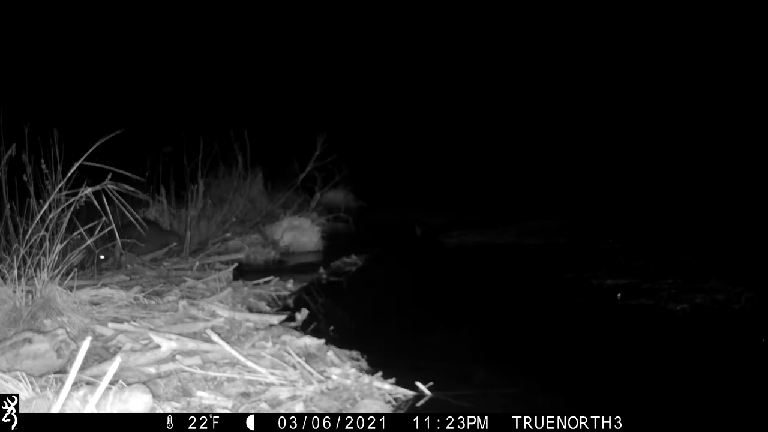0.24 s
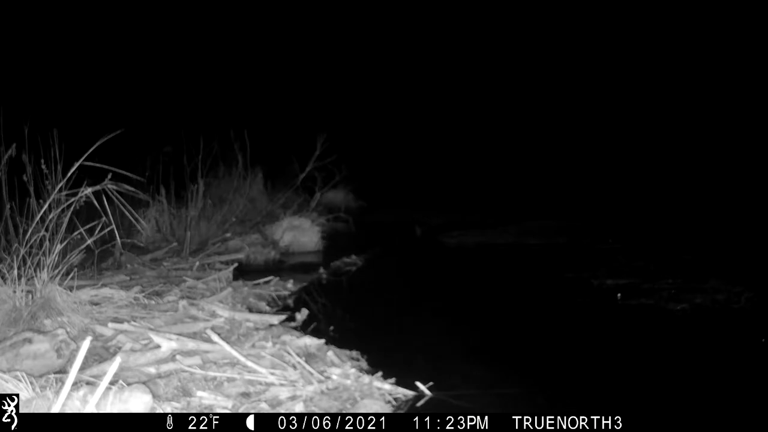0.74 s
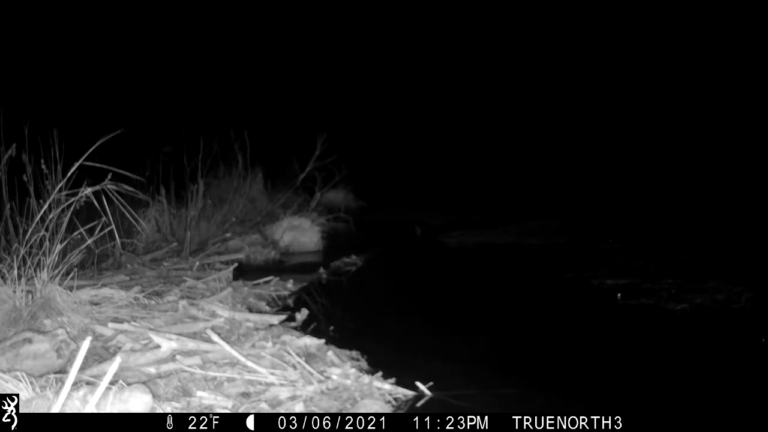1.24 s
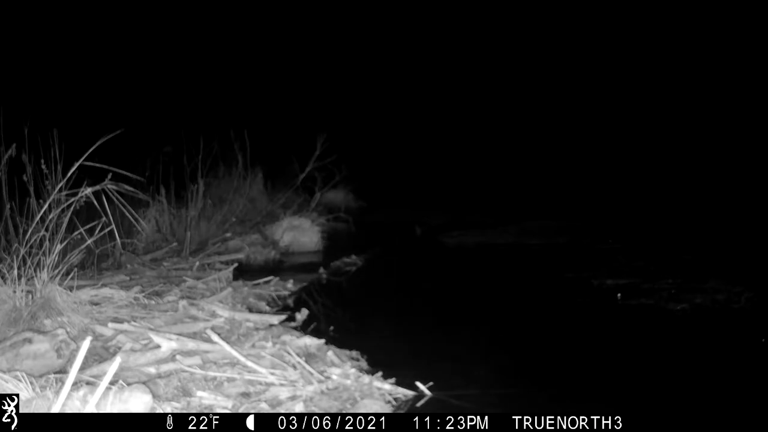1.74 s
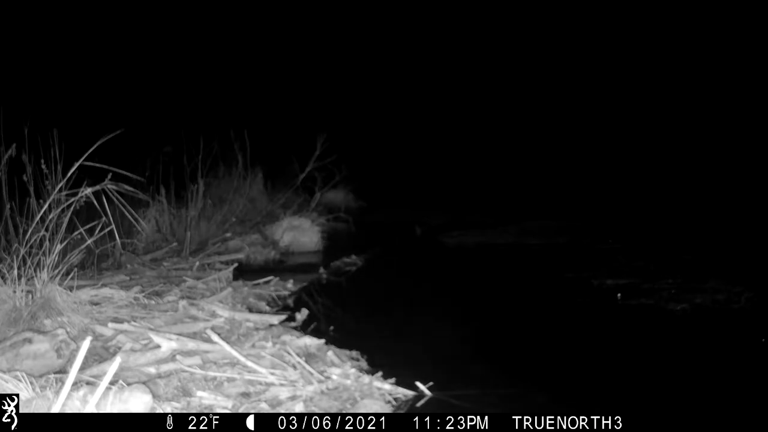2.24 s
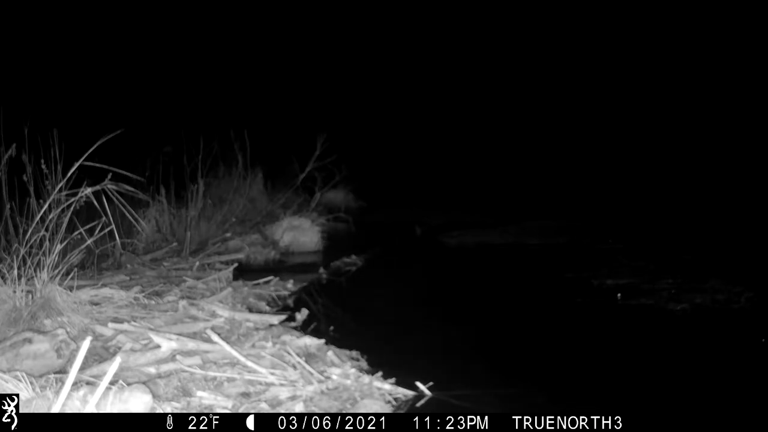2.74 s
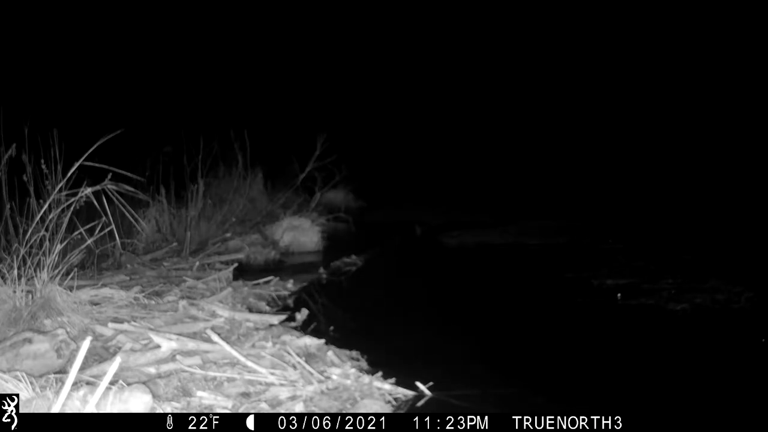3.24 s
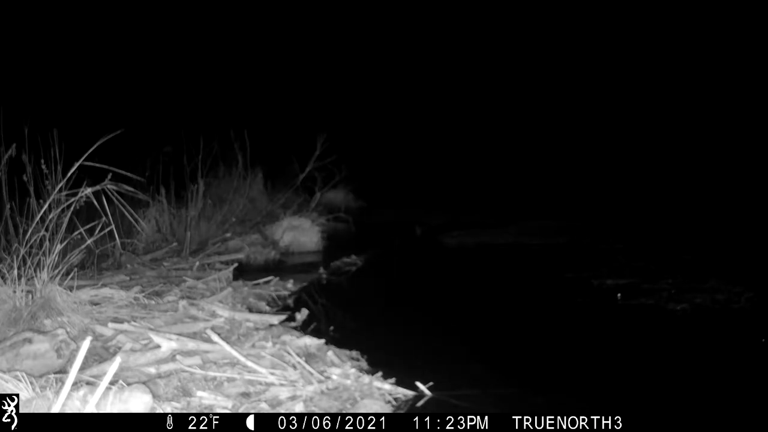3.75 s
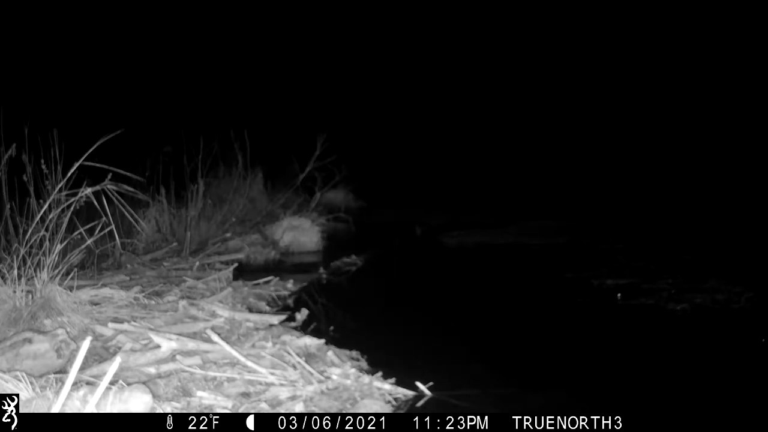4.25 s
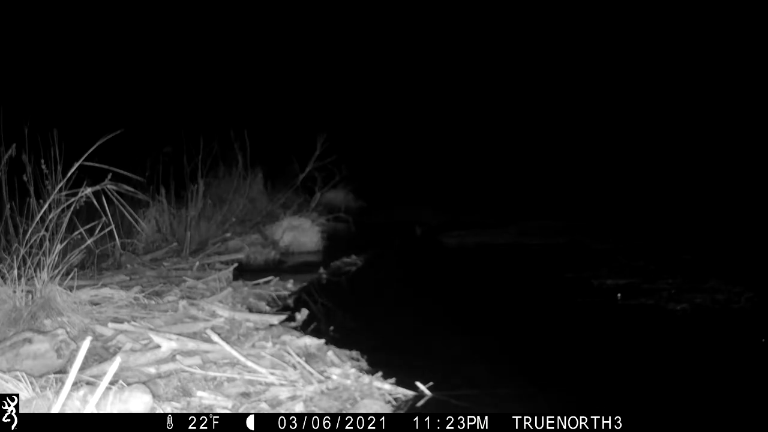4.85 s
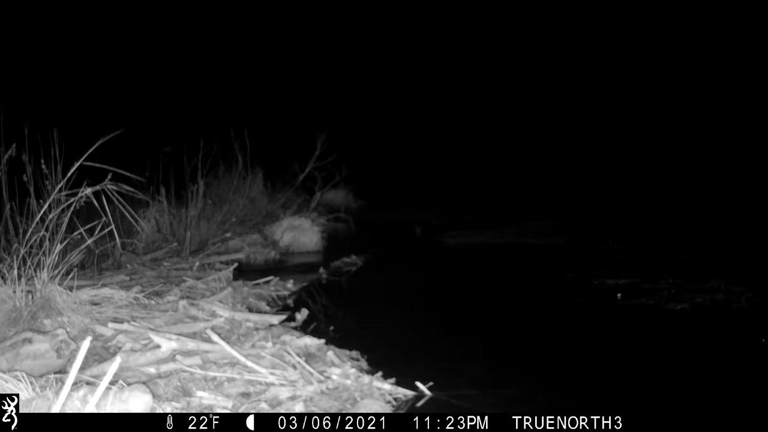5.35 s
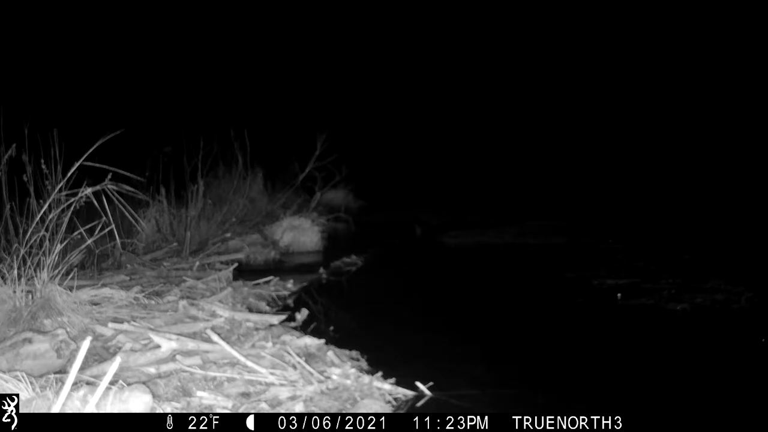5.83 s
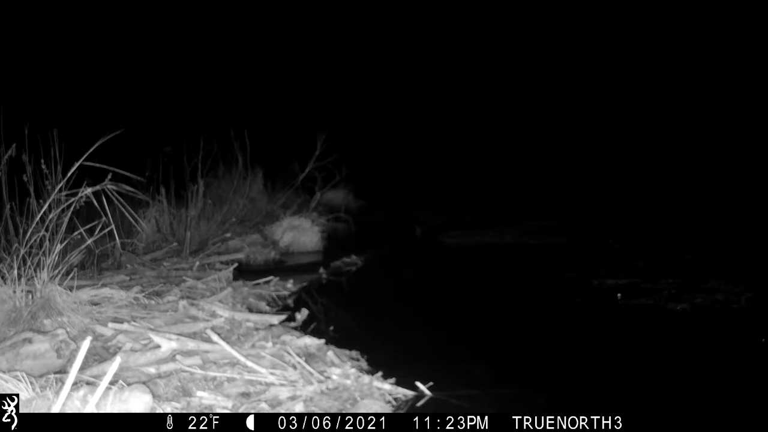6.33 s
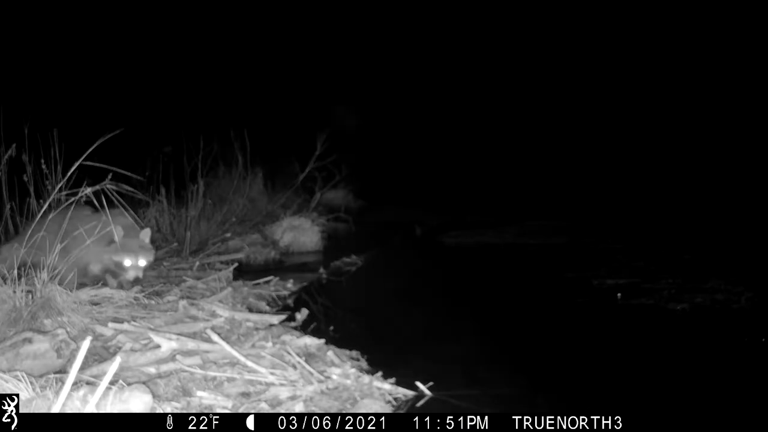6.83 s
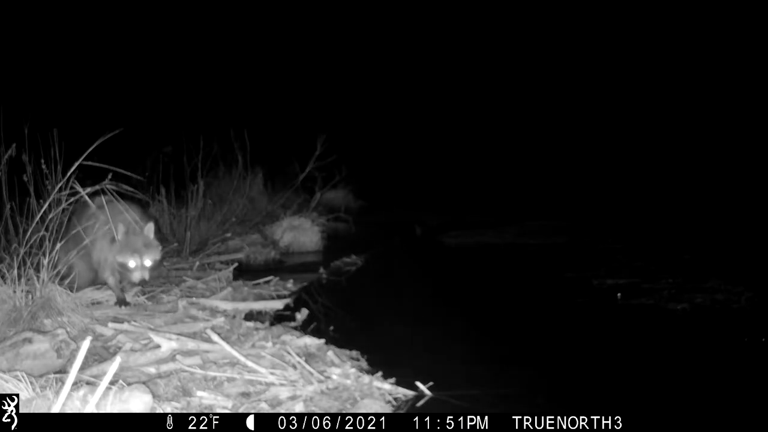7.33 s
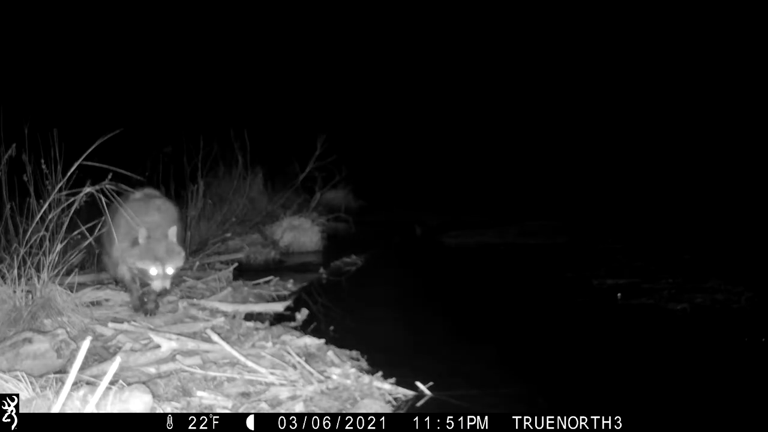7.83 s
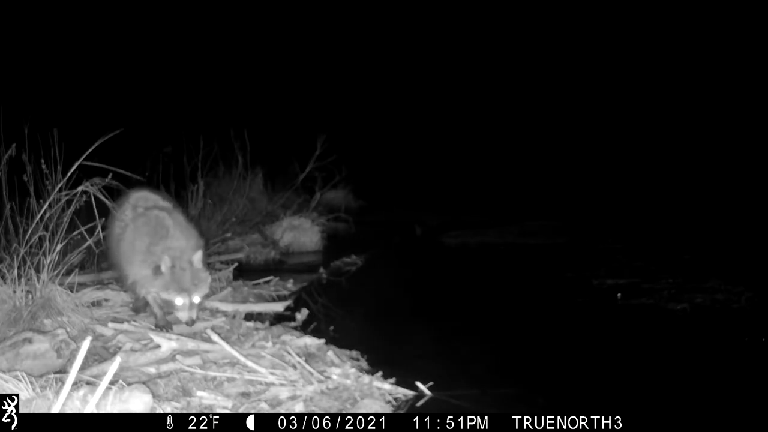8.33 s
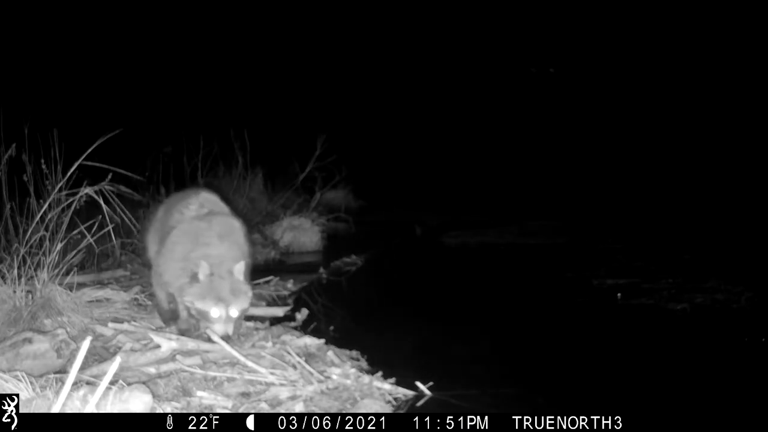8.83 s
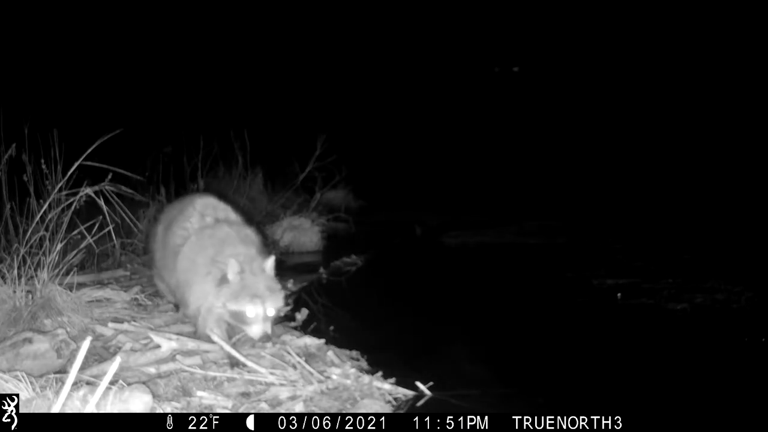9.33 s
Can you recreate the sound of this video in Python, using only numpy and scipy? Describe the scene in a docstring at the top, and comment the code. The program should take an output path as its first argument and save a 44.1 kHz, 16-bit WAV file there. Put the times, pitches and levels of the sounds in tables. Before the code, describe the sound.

Small animals squabble at night in rapid high squeaks, trills and harsh screeches over faint microphone hiss.

```python
"""Small animals squabble close to the microphone at a pond's edge at night: fast trills of arched squeaks
and held cries break into harsh screeches as their vocal folds turn chaotic. The reeds and the far bank
give a faint echo; water plinks, and something stirs the reeds once. The trail camera's cheap microphone
passes little above 4 kHz, overloads on the loudest calls, hisses and whines faintly.
The sound drops out for an instant after the last cry."""
import sys
import numpy as np
from scipy import signal
from scipy.fft import rfft, irfft, next_fast_len
from scipy.io import wavfile
from scipy.ndimage import uniform_filter1d

SR = 44100
rng = np.random.default_rng(int(sys.argv[2]) if len(sys.argv) > 2 else 0)


def file_out(sig):
    """Save sig as 16-bit WAV at sys.argv[1]."""
    # one column per channel
    cols = np.atleast_2d(sig).T
    # limit, then scale
    lim = np.clip(cols, -1, 1)
    pcm = np.round(lim * 32767).astype(np.int16)
    wavfile.write(sys.argv[1], SR, pcm)


N = 422478
TIME = np.arange(N) / SR

# spectrum of the microphone's hiss, also used for the reeds: f/Hz, level/dB
HISS_SPECTRUM = [(18, -49), (30, -20), (166, -10), (250, -6), (587, -2), (1220, -1.5), (3620, -9.5),
                 (4990, -25), (6490, -53.5)]
# clear plinks and ticks on the water: t/s, peak level/dB, f/Hz, length/s
WATER_PLINKS = [(0.399, -28.5, 2700, 0.00088), (7.153, -46, 2010, 0.0127)]
# response of throat and microphone together: f/Hz, level/dB
RESPONSE = [(600, -27), (1000, -17.5), (1500, -24.5), (2100, 5.5), (2800, 2), (3400, 5), (3900, -4),
            (4500, -18.5), (5100, -28.5), (6000, -34.5), (7100, -46), (9000, -38), (10600, -45),
            (13000, -62.5), (15500, -67)]
# path of the throat's resonance: t/s, f/Hz
THROAT_PATH = [(.95, 3200), (1.09, 3550), (1.13, 3300), (1.151, 2450), (1.191, 2500), (1.22, 3200),
               (1.58, 2790), (1.61, 3015), (2.02, 3050), (3.19, 3350), (3.254, 2250), (3.39, 2800),
               (3.449, 3500), (6.52, 3050)]
# the throat rings out between a cry's harmonics: t/s, length/s, strength/0-1
THROAT_RINGS = [(1.58, 0.043, 0.44), (1.987, 0.06, 0.5), (6.5, 0.09, 0.4)]
# every second fold cycle weakens, adding lines at half the pitch: t/s, length/s, depth/0-1
PERIOD_DOUBLING = [(0.096, 0.248, 0.54)]
# gain of the calls above 5.5 kHz: t/s, level/dB
TREBLE_GAIN = [(0, -0.5), (.6, 9), (.9, -0.5), (3.502, -3.5), (3.799, 9), (4.3, -5.5), (4.76, 7.5),
               (5.1, 5), (6.4, 2)]
# squeaks and short snarls: t/s, length/s, level/dB, top f/Hz, harshness/0-1, second over first harmonic/dB
SQUEAK_ARCHES = [(0.452, 0.016, -36, 1290, 0.19, 12), (0.471, 0.023, -29.5, 1796, 0.11, 6),
                 (0.507, 0.014, -30, 1758, 0.25, 23), (0.538, 0.016, -30.5, 1760, 0, 20),
                 (0.567, 0.031, -32, 1780, 0.08, 11), (0.687, 0.026, -32.5, 1794, 0.35, 12.5),
                 (0.72, 0.019, -33, 1906, 0.2, -2), (0.748, 0.036, -39, 1860, 0.51, -12),
                 (0.784, 0.03, -39, 1873, 0.36, -2), (1.315, 0.036, -35, 1858, 0.47, -0.5),
                 (1.349, 0.027, -33, 1968, 0.28, -6), (1.846, 0.036, -27.5, 1640, 0.99, -13),
                 (1.889, 0.021, -22, 1862, 0.6, -1.5), (2.29, 0.035, -32, 1655, 0.95, 7.5),
                 (2.346, 0.016, -38, 1630, 0.9, 11), (2.377, 0.018, -28, 1830, 0.27, 3.5),
                 (2.454, 0.034, -30, 1864, 0.4, -15.5), (2.49, 0.032, -36.5, 1846, 0.88, -9),
                 (2.765, 0.024, -33, 1910, 0.86, -10), (2.806, 0.019, -33, 1990, 0.64, -2.5),
                 (2.843, 0.021, -27, 1857, 0.44, 9), (2.881, 0.02, -16, 1993, 0.2, 0),
                 (2.921, 0.014, -15.5, 1776, 0.04, 7.5), (2.96, 0.012, -23.5, 1920, 0.01, 2),
                 (2.988, 0.022, -26, 2080, 0.3, -18), (3.015, 0.034, -25, 2186, 0.29, -21),
                 (3.049, 0.036, -30, 2215, 0.42, -17), (3.082, 0.029, -34, 2233, 0.42, -16),
                 (3.113, 0.029, -31.5, 2136, 0.16, -18), (3.272, 0.023, -31.5, 1776, 0.19, 1),
                 (3.432, 0.033, -28.5, 1730, 0.64, 10.5), (3.787, 0.015, -42, 1390, 0.56, -11),
                 (3.817, 0.011, -22.5, 1947, 0.9, 7), (3.852, 0.012, -21, 2065, 0.17, -9),
                 (3.882, 0.016, -21.5, 2116, 0.03, -15), (3.918, 0.017, -21.5, 2145, 0, -12.5),
                 (3.959, 0.019, -24, 2075, 0.07, -10.5), (4.002, 0.017, -31.5, 1867, 0.06, 3.5),
                 (4.085, 0.013, -44.5, 1480, 0.28, 16), (4.13, 0.013, -41, 1653, 0.28, 8),
                 (4.157, 0.032, -52.5, 2000, 0.46, -20), (4.19, 0.046, -51, 2084, 0.74, -17),
                 (4.24, 0.032, -51.5, 1814, 0.44, -11), (4.283, 0.019, -51.5, 1740, 0.2, -11),
                 (4.313, 0.037, -51.5, 1656, 0.1, -18), (4.356, 0.036, -48.5, 1760, 0.5, -4),
                 (4.399, 0.033, -50.5, 1622, 0.73, -3), (4.438, 0.04, -54.5, 1695, 0.53, -10),
                 (4.482, 0.041, -52.5, 1520, 0.23, -10), (4.531, 0.036, -47, 1677, 0.85, -2),
                 (4.575, 0.033, -46.5, 1780, 0.32, -3), (4.61, 0.05, -50.5, 1760, 0.44, -6),
                 (4.666, 0.031, -48, 1723, 0.33, 5), (4.705, 0.041, -45, 1680, 0.6, 12),
                 (4.749, 0.017, -30, 1907, 0.38, 10), (4.785, 0.015, -21.5, 1934, 0.07, 11),
                 (4.872, 0.0045, -26.5, 1624, 0.14, 30), (4.899, 0.021, -22, 2048, 0.01, 3)]
# held cries, a curve each: t/s, level/dB, f/Hz, harshness/0-1, second over first harmonic/dB
CRY_CURVES = [
    [(-.01, -26.5, 1785, 0, -3), (.022, -26.5, 1904, 0.2, 8.5), (.032, -23.5, 1661, 0.19, 0.5),
     (.07, -32, 1660, 0.18, -1), (.095, -20, 1706, 0.27, -2.5), (.13, -28.5, 1810, 0.4, -5),
     (.16, -33.5, 1667, 1, -4), (.27, -32, 1731, 0.85, -1.5), (.32, -31.5, 1733, 0.38, 14)],
    [(.595, -32.5, 1548, 0.32, 15), (.64, -44.5, 1647, 0.86, 4), (.68, -33.5, 1656, 1, 17)],
    [(.82, -43, 1707, 0.98, -8.5), (.855, -35.5, 1853, 0.87, -24), (.872, -39.5, 1770, 0.52, -21),
     (.92, -25, 1848, 0.44, -1.5), (.942, -34, 1570, 0.94, 7)],
    [(.944, -31.5, 1755, 1, 5), (.956, -22, 1790, 0.9, 5), (.995, -30.5, 1790, 1, -6),
     (1.055, -22.5, 1850, 0.9, 0), (1.068, -25.5, 1840, 0.9, 0.5)],
    [(1.07, -33.5, 1847, 0.68, 10), (1.088, -12.5, 1822, 0.46, 5), (1.101, -24, 1753, 0.61, 12),
     (1.112, -12.5, 1597, 0.23, 34), (1.126, -16, 1827, .4, 24), (1.142, -24.5, 1400, 0.68, 16),
     (1.2, -27, 1730, 0.97, 13), (1.252, -28.5, 1800, 0.95, -4)],
    [(1.255, -32.5, 1792, 1, -2), (1.295, -23.5, 1963, 0.58, -6), (1.315, -32.5, 1780, 0.75, 32)],
    [(1.378, -38.5, 1840, 0.56, -4), (1.39, -31, 1953, 0.13, -9), (1.415, -36, 1908, 0, -4),
     (1.432, -46, 1730, 0, -13), (1.458, -44, 1253, .15, -22)],
    [(1.472, -44.5, 1543, 0.52, 11), (1.505, -22.5, 1720, 0.2, -7.5), (1.518, -30, 1676, 0.74, -5),
     (1.535, -20.5, 1838, 0.17, -6), (1.553, -31, 1720, 0.61, -17), (1.576, -24, 1839, 0.18, -22),
     (1.6, -26, 1892, 0.29, -11), (1.618, -23.5, 1510, 0.48, 27), (1.642, -34, 1425, 0.57, 4.5)],
    [(1.912, -28.5, 1872, 0, -11), (1.924, -18.5, 2016, 0.16, -25.5), (1.94, -24.5, 1858, 0.17, 7),
     (1.95, -29, 2093, 0.34, -3), (1.965, -23, 1636, 0.33, 15), (1.99, -23, 2000, 0.27, -2),
     (2.018, -22, 2065, 0.56, -15), (2.032, -27, 1763, 0.66, 24), (2.045, -26, 2067, 0.38, -12),
     (2.09, -35.5, 1978, 0.43, 9)],
    [(2.095, -49, 1973, 0.31, 5), (2.165, -42, 1890, 0.6, -7), (2.225, -46, 1845, 0.96, -2)],
    [(2.245, -43, 1450, 0.88, 1), (2.29, -47.5, 1490, 1, 9)],
    [(2.404, -33.5, 1423, 0.45, 31), (2.413, -23, 1680, 0.56, 15), (2.447, -22, 1740, 0.5, 18)],
    [(3.14, -32.5, 1713, 0.92, 11), (3.19, -30, 1707, 0.6, 4.5), (3.215, -33, 1505, 0.7, 9),
     (3.258, -28, 1147, 0.57, 13)],
    [(3.305, -22.5, 1656, 0.15, 8), (3.325, -25, 1564, 0.3, 3.5), (3.345, -24.5, 1473, 0.6, 2.5),
     (3.39, -30.5, 1436, 0.94, -2), (3.428, -26, 1433, 0.85, 12.5)],
    [(4.82, -36, 1370, 0.2, 11), (4.835, -25, 1694, 0.12, 28), (4.85, -21.5, 1702, 0.14, 28),
     (4.862, -21.5, 2020, 0, 10), (4.874, -29.5, 2055, 0.3, -7), (4.882, -39, 1700, 0.9, 15)],
    [(4.917, -20.5, 1640, 0.35, 26), (4.94, -20, 1960, 0.14, 11.5), (4.957, -27, 1843, 0.53, 17.5),
     (4.98, -24.5, 2010, 0.85, 0.5), (4.995, -30, 1867, 0.63, -5), (5.015, -23, 1957, 0.23, -11),
     (5.04, -26, 1786, 1, 0.5), (5.075, -35.5, 1261, 0.9, -2)],
    [(6.415, -33, 916, 0.15, 9), (6.428, -25, 1629, 0.18, 5.5), (6.445, -22.5, 1945, 0.25, -19),
     (6.46, -22.5, 2150, 0.36, -21), (6.478, -40.5, 1570, 0.73, 11), (6.49, -24, 2244, 0.08, -15),
     (6.515, -21.5, 2294, 0.07, -18), (6.527, -22, 2200, .4, -11), (6.534, -33, 1620, 0.4, 25),
     (6.541, -22, 2168, 0.13, -17), (6.595, -31.5, 2118, 0.39, -18.5), (6.612, -30.5, 1807, 0.1, 0),
     (6.63, -44, 1980, 0.55, 3), (6.655, -29.5, 2110, 0, -22), (6.68, -27.5, 1870, 0.76, 10),
     (6.71, -38.5, 1490, 0.75, 15)],
]

LEAD_S = 0.0027  # each call runs this much over at both ends


def amp(db):
    """Decibels to amplitude."""
    return 10 ** (np.asarray(db) / 20)


def unit_rms(x):
    """x scaled to rms 1."""
    return x / np.sqrt(np.mean(x ** 2) + 1e-20)


def db_at(spectrum, hz):
    """Level of a spectrum table at hz."""
    f, db = np.transpose(spectrum)
    return np.interp(np.log(hz + 1), np.log(f + 1), db)


def add(mix, start_s, sound):
    """Mix a sound in, trimming what falls outside."""
    at = round(start_s * SR)
    sound = sound[max(-at, 0):]
    part = mix[max(at, 0):][:len(sound)]
    part += sound[:len(part)]


def noise(shape_db):
    """Steady noise of rms 1 whose spectrum is shape_db(hz)."""
    size = next_fast_len(N)
    gain = amp(shape_db(np.fft.rfftfreq(size, 1 / SR)))
    return unit_rms(irfft(rfft(rng.standard_normal(size)) * gain, size)[:N])


def wander(top_hz):
    """Smooth random drift up to top_hz."""
    return noise(lambda hz: -10 * np.log10(1 + (hz / top_hz) ** 6))


def hump(start_s, length):
    """One half-sine rise and fall on the scene's time axis."""
    return np.sin(np.pi * np.clip((TIME - start_s) / length, 0, 1))


def microphone_hiss(db=-61):
    """The microphone's own noise, wavering slightly."""
    return amp(db + .8 * wander(12)) * noise(lambda hz: np.maximum(db_at(HISS_SPECTRUM, hz), -39))


def sensor_whine(hz=7787.5, flip_hz=29.65):
    """A thin sensor tone that keeps flipping sign, one half of each cycle louder."""
    flips = np.sign(np.sin(2 * np.pi * flip_hz * (TIME - 7.054))) + .22
    turns = hz * TIME + np.cumsum(4 * wander(5)) / SR
    return amp(-81) * flips * np.sin(2 * np.pi * turns)


def reed_rustle(start_s=5.1, length_s=.35, db=-59):
    """Something stirs the reeds: a short, uneven swell of soft noise."""
    return amp(db + 2 * wander(40.6)) * hump(start_s, length_s) * noise(lambda hz: db_at(HISS_SPECTRUM, hz))


def water_plinks(per_s=45, faint_db=-63):
    """Short soft-edged tones off the pond: two clear ones and a faint scatter."""
    draws = rng.random((int(per_s * N / SR), 4))
    faint = [(when * N / SR, faint_db + 9 * loud ** 2, 1800 + 2000 * high, .002 + .003 * long)
             for when, loud, high, long in draws]
    out = np.zeros(N)
    for centre_s, db, hz, length in WATER_PLINKS + faint:
        t = np.arange(0, length, 1 / SR)
        envelope = amp(db) * np.sin(np.pi * t / length) ** 2
        add(out, centre_s - length / 2, envelope * np.sin(2 * np.pi * hz * t))
    return out


def bank_echo(x, far_t60=0.86, near_db=12, near_t60=.08):
    """Near reeds scatter a quick blur, the far bank a soft dying tail."""
    t = np.arange(SR // 2) / SR
    tail = rng.standard_normal(len(t)) * (amp(-60 * t / far_t60) + amp(near_db - 60 * t / near_t60))
    return signal.fftconvolve(x, tail / np.linalg.norm(tail))[:N]


def throat(fits, ring_db=5):
    """Turbulence below and above 2.7 kHz, and a narrow resonance that glides about and rings raspily."""
    ring_hz = np.interp(TIME, *np.transpose(THROAT_PATH)) + 150 * np.tanh(wander(30)) + 150 * wander(400)
    ring = fits ** .5 * np.cos(2 * np.pi * np.cumsum(ring_hz) / SR)
    mouth = amp(2.5 * wander(35))  # the mouth keeps shifting, so the two bands trade strength
    low_share = lambda hz: 1 / (1 + (hz / 2700) ** 8)
    dull = noise(lambda hz: db_at(RESPONSE, hz) + 10 * np.log10(low_share(hz))) / mouth
    bright = noise(lambda hz: db_at(RESPONSE, hz) + 10 * np.log10(1 - low_share(hz) + 1e-9)) * mouth
    return dull, unit_rms(bright + amp(ring_db) * ring), ring


def bounded(x, levelling=0.68):
    """Chaotic folds swing irregularly but never far: the envelope is partly levelled."""
    envelope = uniform_filter1d(abs(signal.hilbert(x)), size=70)
    return unit_rms(x / (envelope + 0.26) ** levelling)


def swell(t, edge_s):
    """Quarter-sine ends; the rise is a touch quicker than the fall."""
    from_end = np.minimum((t - t[0]) / 0.98, t[-1] - t)
    return np.sin(np.pi / 2 * np.clip(from_end / edge_s, 0, 1))


def squeak(start_s, length, db, top_hz, harsh, second_db):
    """Contours of a pitch arch that frays as it falls; harsh ones arch less."""
    t = np.arange(start_s - LEAD_S, start_s + length + LEAD_S, 1 / SR)
    place = np.clip(2 * (t - start_s) / length - 1, -1.4, 1.4)  # -1 at the start, 1 at the end
    from_top = abs(place - 0.14 * (1 - place ** 2))  # the top comes late
    hz = top_hz * (1 - 0.2 * (1 - harsh) * from_top ** 2.4)
    fray = 0.17 * np.clip(place, 0, 1) ** 2
    return t, amp(db) * unit_rms(swell(t, edge_s=0.012)), hz, top_hz, harsh + fray, second_db


def cry(curve):
    """Contours of a held call that follows its curve."""
    times, *columns = np.transpose(curve)
    t = np.arange(times[0] - LEAD_S, times[-1] + LEAD_S, 1 / SR)
    db, hz, harsh, second_db = [np.interp(t, times, column) for column in columns]
    return t, amp(db) * swell(t, edge_s=0.011), hz, hz, harsh, second_db


def animals(wobble_hz=260, max_harsh=.82):
    """Close by, vocal folds sing harmonics; as they turn chaotic these smear and noise fills the throat."""
    fits = amp(13.5 * np.tanh(wander(43)))  # fitful bursts of strain
    dull, bright, ring = throat(fits)
    rings = ring * sum(strength * hump(s, length) for s, length, strength in THROAT_RINGS)
    doubling = sum(depth * np.sqrt(hump(s, length)) for s, length, depth in PERIOD_DOUBLING)
    flutter = 1.5 * np.tanh(wander(200))
    wobble = wobble_hz * np.tanh(wander(245))
    out = np.zeros(N)
    calls = [squeak(*row) for row in SQUEAK_ARCHES] + [cry(curve) for curve in CRY_CURVES]
    for t, level, hz, top_hz, harsh, second_db in calls:
        harsh = np.clip(harsh, 0, max_harsh)
        span = round(t[0] * SR) + np.arange(len(t))
        turns = np.cumsum(hz + harsh * wobble[span]) / SR
        partial = lambda k: amp(db_at(RESPONSE, k * hz)) * np.cos(2 * np.pi * k * turns)
        first = amp(-db_at(RESPONSE, top_hz)) * partial(1)
        second = amp(second_db - db_at(RESPONSE, 2 * top_hz)) * partial(2)
        lower = (first - second) / np.hypot(1, amp(second_db))
        lower *= 1 + doubling[span] * np.cos(np.pi * turns)
        # upper harmonics grow faster than the call's level
        upper = amp(-4) * (level / amp(-24.5)) ** 0.15 * sum(partial(k) for k in range(3, 9))
        # strained folds skip beats in fits: lines between the harmonics
        skipped = amp(-7) * harsh * fits[span] * sum(partial(k + .5) for k in range(1, 7))
        sung = unit_rms(lower - upper + skipped + rings[span])
        # uneven cycles spread each line into a raspy band; turbulence fills the rest
        brightness = amp(0.52 * second_db)
        turbulence = (dull[span] + brightness * bright[span]) / np.hypot(1, brightness)
        screech = bounded(turbulence + .8 * sung * flutter[span])
        add(out, t[0], level * (np.sqrt(1 - harsh) * sung + harsh ** .9 * screech))
    low = signal.oaconvolve(out, signal.firwin(101, 5500, fs=SR), "same")
    out = low + (out - low) * amp(np.interp(TIME, *np.transpose(TREBLE_GAIN)))
    # a small mouth radiates little bass
    return signal.sosfilt(signal.butter(2, 1100, "high", fs=SR, output="sos"), out)


def scene():
    """The pond's edge from one microphone, the animals well in front of their echo."""
    calls = animals()
    hiss = microphone_hiss()
    pond = amp(-16.5) * bank_echo(calls) + water_plinks() + reed_rustle()
    return (calls + pond + hiss + sensor_whine())[None]


def record(dry, dropout_s=(6.776, 6.797), top_hz=15650):
    """The input clips its negative side first; the coupling capacitor turns the shift into a thump."""
    excess = dry - np.clip(dry, -.24, .31)
    dull_excess = signal.sosfilt(signal.butter(2, 6000, fs=SR, output="sos"), excess)
    crackle = amp(-7.5) * excess
    coupled = signal.lfilter(*signal.butter(1, 16, "high", fs=SR), dry - dull_excess - crackle)
    gate = np.clip(np.maximum(dropout_s[0] - TIME, TIME - dropout_s[1]) / 0.0042, 0, 1)
    band_limit = signal.firwin(511, top_hz, window=("kaiser", 9), fs=SR)
    return signal.oaconvolve(coupled * gate, band_limit[None], "same")


dry = scene()
out = record(dry)
file_out(out)
```